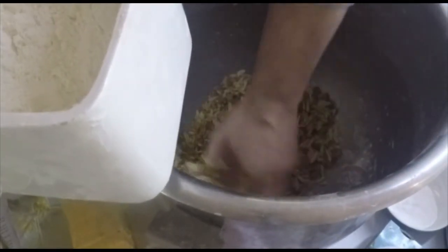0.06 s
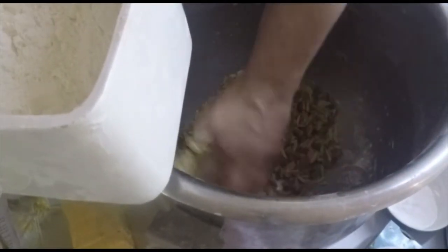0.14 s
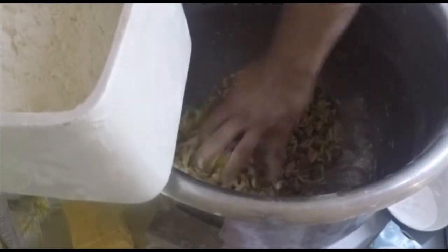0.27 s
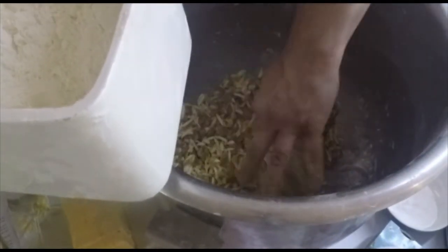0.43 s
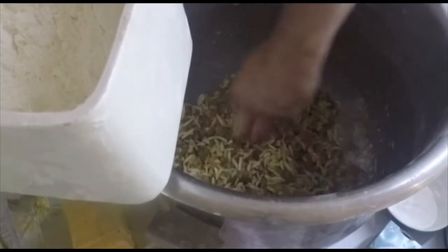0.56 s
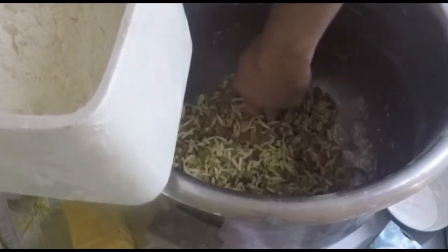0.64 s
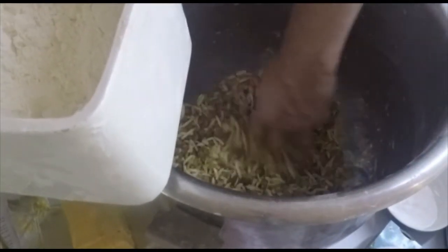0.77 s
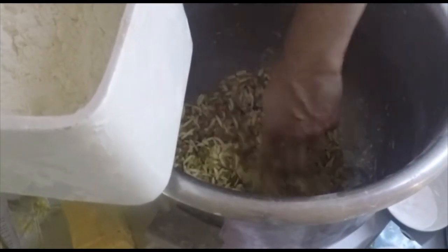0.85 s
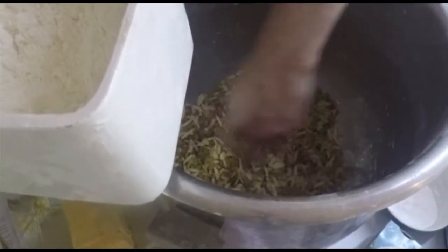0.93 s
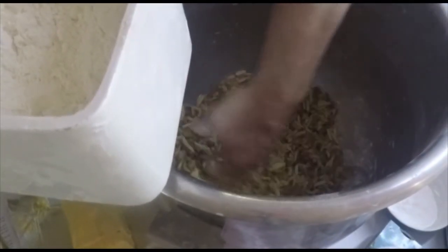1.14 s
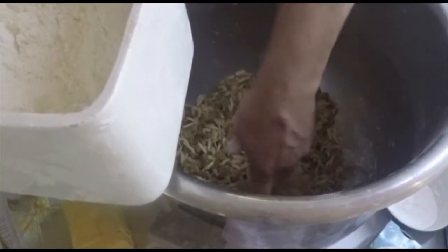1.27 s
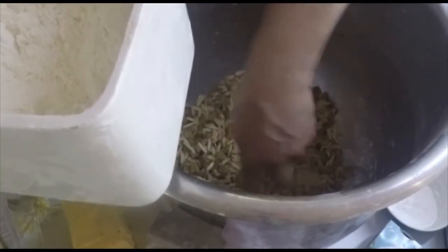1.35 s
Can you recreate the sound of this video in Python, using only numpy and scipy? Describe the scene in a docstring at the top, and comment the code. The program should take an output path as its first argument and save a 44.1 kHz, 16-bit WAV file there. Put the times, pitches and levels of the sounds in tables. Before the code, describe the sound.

Dry almond pieces click, crackle and rustle as a hand stirs them in a large metal bowl. Three quick clusters come with soft scuffs and low bumps, then thin out, heard close by in a quiet kitchen.

```python
"""Dry almond pieces click and crackle as a hand stirs and squeezes them in a large metal bowl.
Each click is a quick spray of tiny slips; between clicks the pieces rub, rustle and knock dully.
The hand adds soft shoves, scuffs, hollow rubs and low bumps of the shifting bowl.
The bowl throws back the sounds of the pieces and rings faintly; a quiet kitchen rumbles underneath."""
import sys
import numpy as np
from scipy import signal
from scipy.fft import rfft, irfft
from scipy.io import wavfile
from scipy.ndimage import uniform_filter1d

SR = 44100
rng = np.random.default_rng(int(sys.argv[2]) if len(sys.argv) > 2 else 0)


def to_wav(sig):
    """Store sig (one row per channel, or 1-D mono) as 16-bit WAV at the path in sys.argv[1].

    Samples outside -1..1 are clipped; the rate is SR.
    """
    pcm = np.clip(np.atleast_2d(sig), -1, 1) * 32767
    pcm = np.round(pcm).astype(np.int16)
    wavfile.write(sys.argv[1], SR, pcm.T)  # frames by channels


N = 61739
HZ = np.fft.rfftfreq(2048, 1 / SR)  # a "tone" below is a level in dB for each of these frequencies

# the bright tone, peaking near 5 kHz, of clicks, rubs and rustle (frequency [Hz], relative level [dB])
BRIGHT_TONE = [(200, -53), (700, -32.5), (1100, -37), (2400, -26), (3150, -17), (3680, -7.5), (4330, -11.5),
               (4800, 0), (5400, -4), (6100, -5), (7200, -14.5), (9000, -23), (11800, -28.5)]
# first echoes off the bowl wall (delay [s], gain [factor])
WALL_ECHOES = [(.0029, 0.24), (.0052, 0.17), (.0078, 0.083)]


def amp(db):
    """Turns decibels into a gain."""
    return 10 ** (np.asarray(db) / 20)


def unit_power(x):
    """Scales a sound to an average power of 1."""
    return x / np.sqrt(np.mean(x ** 2) + 1e-20)


def unit_energy(x):
    """Scales a sound to a total energy of 1."""
    return x / (np.linalg.norm(x) + 1e-12)


def curve_at(points, hz):
    """Joins the points of a table along a logarithmic frequency axis."""
    point_hz, value = np.transpose(points)
    return np.interp(np.log(hz + 1), np.log(point_hz + 1), value)


def add(mix, start_s, sound):
    """Mixes a sound in, dropping whatever sticks out at either end."""
    at = round(start_s * SR)
    sound = sound[max(-at, 0):]
    part = mix[max(at, 0):]
    part[:len(sound)] += sound[:len(part)]


def shape_tone(x, tone):
    """Filters a sound so that it takes on a tone; the filter rings only after each hit."""
    log_gain = np.log(amp(np.concatenate([tone, tone[-2:0:-1]])))
    response = np.exp(np.conj(signal.hilbert(log_gain)))  # minimum phase
    return signal.fftconvolve(x, np.fft.ifft(response).real)


def peak_tone(hz, width_hz):
    """The tone of something that rings around one pitch."""
    return -20 * np.log10(1 + ((HZ - hz) / width_hz) ** 2)


def varied_tone(hz, treble_db, body_db=0, pitch_db=8):
    """The shared bright tone, given its own pitch, treble and hollow body for one click or rub."""
    pitch = np.exp(-((HZ - hz) / 304) ** 2)
    treble = np.interp(HZ, [5170, 9140], [0, 1])
    body = np.exp(-((HZ - 3400) / 1430) ** 2)
    return curve_at(BRIGHT_TONE, HZ) + pitch_db * pitch + treble_db * treble + body_db * body


def grains(size, per_s=3700, spread_db=2.5):
    """A dense stream of tiny touches of uneven strength."""
    hits = rng.random(size) < per_s / SR
    signs = rng.choice([-1, 1], size)
    strength = amp(spread_db * np.minimum(rng.exponential(1, size), 4))
    return hits * signs * strength


def stroke(length_s, tone):
    """Grains of one tone that swell and fade with a move of the hand."""
    size = int(length_s * SR)
    friction = shape_tone(grains(N // 2)[:size], tone)[:size]
    swell = np.sin(np.pi * np.arange(size) / size)
    return unit_power(friction) * swell


def contact(fade_s, tone, rise_s=0.00067, slips_per_s=8300, size=1024):
    """Two pieces meet: a spray of tiny slips builds within a millisecond and dies quickly."""
    t = np.arange(size) / SR
    envelope = np.minimum(t / rise_s, 1) * np.exp(-t / 2 / max(fade_s, 2e-4))
    slips = rng.standard_normal(size) * (rng.random(size) < slips_per_s / SR)
    spectrum = rfft(envelope * slips)
    smooth_power = uniform_filter1d(abs(spectrum) ** 2, size=25)
    spray = irfft(spectrum / np.sqrt(smooth_power + 1e-12), size)  # evenly strong from low to high
    return unit_energy(shape_tone(spray * envelope, tone))


def kitchen(level_db=-53):
    """The steady low rumble and faint hiss of the room."""
    # the tone of the room noise (frequency [Hz], relative level [dB])
    room_tone = [(12, -21.5), (20, -4.5), (58, -4.5), (105, -13.5), (149, -13), (184, -13), (360, -20),
                 (483, -25.5), (524, -28), (649, -28.5), (1110, -34), (1750, -31.5), (2110, -34.5),
                 (2280, -33), (12000, -46), (15600, -81), (22000, -120)]
    gain = amp(curve_at(room_tone, np.fft.rfftfreq(N, 1 / SR)))
    noise = irfft(rfft(rng.standard_normal(N)) * gain, N)
    return amp(level_db) * unit_power(noise)


def echo_tail(size, tail_db=-5, flutter_db=-5.5, flutter_fade_s=0.067):
    """Echoes blur into a short flutter in the bowl and a longer tail of bowl and kitchen."""
    # how long the tail lasts (frequency [Hz], time to fade by 60 dB [s])
    fade_times = [(300, .35), (1500, 0.49), (5000, 0.22), (11000, 0.23)]
    t = np.arange(size) / SR
    hz, frame_s, bands = signal.stft(rng.standard_normal(size), SR, nperseg=256)
    fade = amp(-60 * frame_s / curve_at(fade_times, hz)[:, None])
    tail = signal.istft(bands * fade, SR, nperseg=256)[1][:size]
    flutter = rng.standard_normal(size) * amp(-60 * t / flutter_fade_s)
    echoes = amp(tail_db) * unit_energy(tail) + amp(flutter_db) * unit_energy(flutter)
    after_first_echo = t > WALL_ECHOES[0][0]
    slight_dip_db = -0.5 * np.exp(-((HZ - 5400) / 280) ** 2)
    return shape_tone(echoes * after_first_echo, slight_dip_db)


def bowl(sound, ring_db=-28.5, turn_s=0.045, tails=4, size=16384):
    """The steel wall adds echoes, a faint ring, and several soft tails that fade in and out in turn."""
    # the notes the bowl rings with (pitch [Hz], relative level [dB], time to fade by 60 dB [s])
    notes = [(3670, -7, 0.5), (5120, 9, 0.22), (4985, 8.5, 0.24), (4900, -23, .3), (5180, 1, 0.54),
             (5604, 13, 0.19), (5600, 2.5, 0.6)]
    t = np.arange(size) / SR
    ring = sum(amp(db - 60 * t / fade_s) * np.sin(2 * np.pi * hz * t) for hz, db, fade_s in notes)
    response = amp(ring_db) * unit_energy(ring)
    response[0] = 1  # the direct sound
    for delay, gain in WALL_ECHOES:
        add(response, delay, np.array([gain]))
    out = signal.fftconvolve(sound, response)[:N]
    turns = np.arange(N) / SR / turn_s
    for k in range(tails):  # taking turns keeps any one tail from colouring every click alike
        share = np.sqrt(2 / tails) * np.cos(np.pi * ((k // 2 + 1) * turns + k / 2))
        out += signal.fftconvolve(sound * share, echo_tail(size))[:N]
    return out


def hand():
    """The low sounds of stirring: the hand shoves the heap, rubs the bowl and shifts it."""
    # the hand shoving the heap (start [s], length [s], level [dB])
    shoves = [(0.091, .36, -57.5), (.49, 0.12, -50.5), (.62, 0.055, -67), (.89, 0.09, -61.5)]
    # the tone of the shifting heap (frequency [Hz], relative level [dB])
    heap_tone = [(40, -16), (130, 4.5), (240, 1), (400, -6.5), (560, -12.5), (700, -1.5), (950, -15.5),
                 (1600, -13.5), (3000, -9.5), (7000, -21.5)]
    # hollow rubs of the hand along the bowl (start [s], length [s], level [dB], pitch [Hz])
    hollow_rubs = [(0.101, 0.36, -60, 405), (0.302, 0.39, -59, 410), (0.829, 0.092, -61.5, 400),
                   (0.948, 0.26, -57, 393)]
    # soft low bumps as the bowl shifts (start [s], length [s], level [dB], pitch [Hz])
    bumps = [(.11, 0.063, -48, 45), (0.252, 0.07, -46.5, 48), (0.481, 0.084, -55, 70),
             (.5, 0.096, -57, 184), (.64, 0.18, -59, 189), (0.727, 0.14, -50.5, 50.7)]
    out = np.zeros(N)
    for start, length, db in shoves:
        add(out, start, amp(db) * stroke(length, curve_at(heap_tone, HZ)))
    for start, length, db, hz in hollow_rubs:
        add(out, start, amp(db) * stroke(length, peak_tone(hz, width_hz=59)))
    for start, length, db, hz in bumps:
        add(out, start, amp(db) * stroke(length, peak_tone(hz, width_hz=28)))
    return out


def heap_rustle():
    """Countless tiny touches in the whole heap blend into a faint rustle."""
    # how the rustle rises and falls (time [s], level [dB])
    levels = [(0, -75.5), (.2, -58.5), (.45, -70.5), (.62, -63), (.8, -76), (.88, -77), (1.05, -66.5),
              (1.3, -68.5), (1.4, -92)]
    level_db = np.interp(np.arange(N) / SR, *np.transpose(levels))
    rustle = shape_tone(grains(N), curve_at(BRIGHT_TONE, HZ))[:N]
    return amp(level_db) * unit_power(rustle)


def finger_scuffs():
    """Fingers brush softly through the heap."""
    # moves of the fingers (start [s], length [s], level [dB], pitch [Hz])
    scuffs = [(0.129, .24, -63, 1980), (.36, 0.21, -65, 1440), (0.728, 0.087, -66.5, 2160),
              (1.009, 0.067, -70, 2300), (1.091, 0.13, -67, 6200)]
    out = np.zeros(N)
    for start, length, db, hz in scuffs:
        add(out, start, amp(db) * stroke(length, peak_tone(hz, width_hz=1370)))
    return out


def almond_rubs():
    """Pieces slide along each other under the hand with a bright rasp."""
    # slides of the pieces (start [s], length [s], level [dB], pitch [Hz], treble [dB])
    rubs = [(-.02, 0.088, -52, 4660, 6.5), (.13, .11, -52, 4400, -9), (.215, 0.044, -46.5, 5450, -3),
            (.262, 0.042, -35, 5280, 4.5), (.525, 0.038, -41, 5600, 7), (0.718, 0.098, -66.5, 5430, 15),
            (1.07, 0.18, -55, 4430, 8)]
    out = np.zeros(N)
    for start, length, db, hz, treble_db in rubs:
        add(out, start, amp(db) * stroke(length, varied_tone(hz, treble_db)))
    return out


def almond_knocks(fade_s=0.0035):
    """Pieces knock dully together deep in the heap."""
    # dull knocks (time [s], level [dB], pitch [Hz])
    knocks = [(.0095, -35.5, 1920), (0.029, -41, 1920), (0.117, -32, 2120), (.271, -32, 2230),
              (.374, -31, 1870), (.506, -30.5, 3120), (.915, -35, 2280), (0.917, -33, 680),
              (1.053, -37, 2180)]
    out = np.zeros(N)
    for start, db, hz in knocks:
        add(out, start, amp(db) * contact(fade_s, peak_tone(hz, width_hz=420)))
    return out


def almond_clicks():
    """Pieces snap against each other in crackling clusters."""
    # sharp snaps (time [s], level [dB], fade time [s], pitch [Hz], treble [dB], body [dB])
    clicks = [(0.0942, -25.5, 0.0064, 4650, 4, 2.5), (0.0983, -29, 0.0022, 5560, -9, 1),
              (0.1087, -28, 0.0044, 5600, 4, -2), (0.138, -18.5, 0.006, 4200, -5, 7),
              (0.145, -20, 0.01, 4900, 4, 1), (.160, -20.5, 0.012, 5200, -1, -2),
              (0.171, -19, 0.0058, 5400, 2, 1), (0.204, -37, .005, 4560, -11, 9),
              (0.2168, -5.5, 0.0029, 5370, -6.5, -4.5), (0.267, -6.5, 0.0038, 5030, -3, 8.5),
              (0.2715, -1.5, 0.0027, 5080, -3, -6.5), (0.273, -2.5, 0.006, 5560, -17, -10.5),
              (0.286, -12, 0.0025, 5200, -13, -5), (0.29, -7, 0.0023, 5000, 5, -6),
              (0.2944, -4, 0.0013, 5300, -1, -3.5), (.311, -15, .002, 5100, 10, 8),
              (0.328, -24, 0.0016, 4800, 8, 2), (0.509, -17, 0.012, 5460, -3.5, 9),
              (0.5281, -9, 0.0035, 4970, 5.5, -0.5), (0.5406, -6, 0.0073, 4820, -11, 0),
              (.549, -9, .003, 5360, -5, 1), (0.553, -10.5, 0.0036, 5800, -8.5, -15),
              (.5595, -17.5, 0.0016, 5340, 5, 7), (0.565, -18.5, 0.0051, 5530, 0, -4),
              (0.6584, -23.5, 0.0039, 5070, 2.5, 5), (0.724, -28, 0.0012, 5070, 3, 6),
              (.897, -20, 0.0023, 5300, -5, 5.5), (0.913, -18.5, 0.0027, 5230, 0, 4),
              (0.9156, -8, .0013, 5280, -5.5, -1.5), (0.923, -23, 0.0044, 5500, -1, -12),
              (0.94, -21, 0.011, 4900, 5, 4), (0.95, -26, 0.0054, 5000, -7, -2),
              (0.9756, -23, 0.009, 5860, 2, -10), (0.9866, -19.5, 0.0012, 4800, -51, -5),
              (1.03, -23, 0.0026, 4800, -10, 1), (1.269, -27.5, 0.0045, 5250, -8, -1),
              (1.3301, -20.5, 0.0012, 4800, -22, 3), (1.3703, -34, 0.0023, 3360, -5, 8)]
    out = np.zeros(N)
    for start, db, fade_s, hz, treble_db, body_db in clicks:
        add(out, start, amp(db) * contact(fade_s, varied_tone(hz, treble_db, body_db)))
    return out


def scene():
    """The almonds echo in their bowl, over the kitchen and the low sounds of the hand."""
    background = kitchen() + hand()
    almonds = heap_rustle() + almond_clicks() + almond_rubs() + finger_scuffs() + almond_knocks()
    return (background + bowl(almonds))[None]


def record(dry, cutoff_hz=11900):
    """Takes away the highest treble."""
    low_pass = signal.firwin(401, cutoff_hz, window=("kaiser", 8), fs=SR)
    return signal.oaconvolve(dry, low_pass[None], "same")


dry = scene()
out = record(dry)
to_wav(out)
```